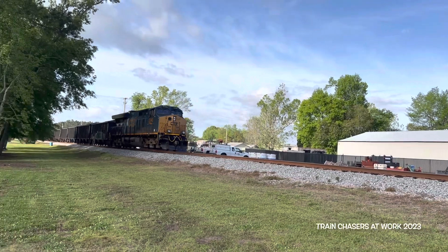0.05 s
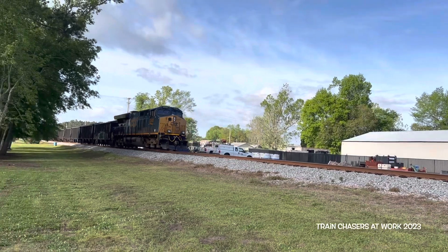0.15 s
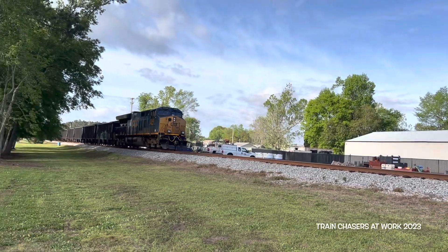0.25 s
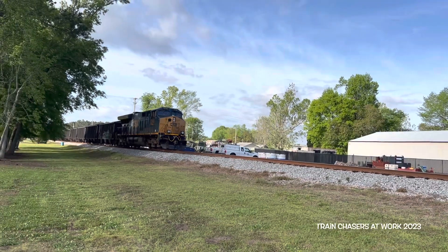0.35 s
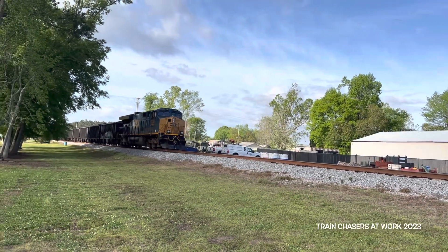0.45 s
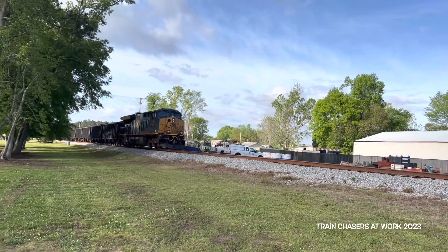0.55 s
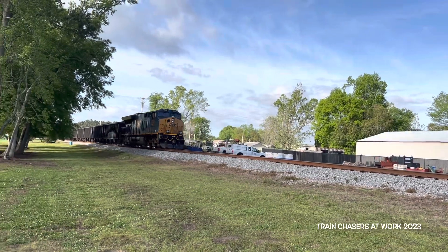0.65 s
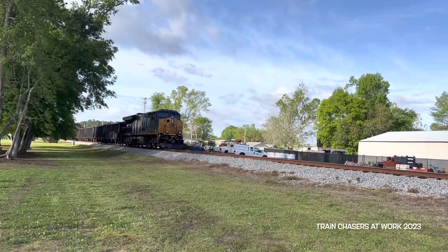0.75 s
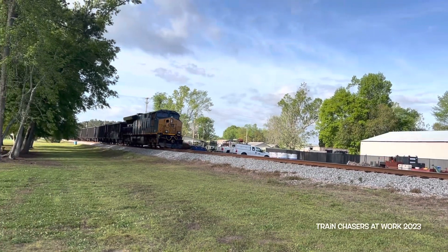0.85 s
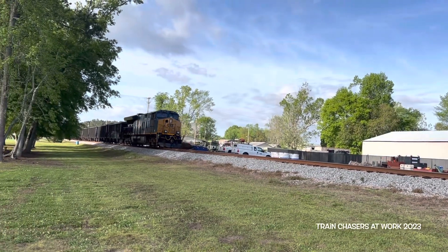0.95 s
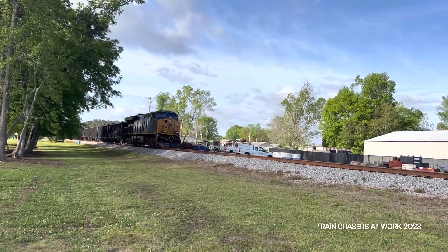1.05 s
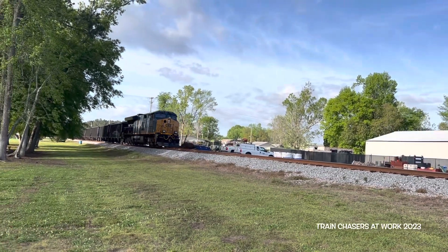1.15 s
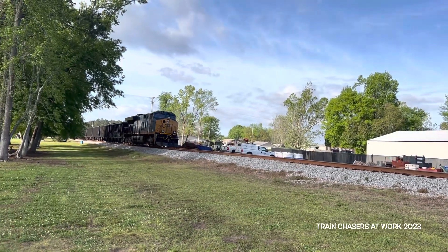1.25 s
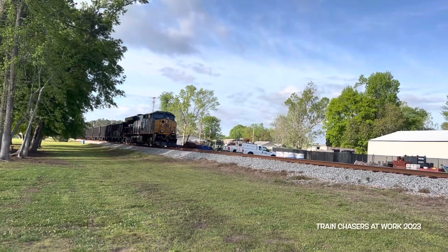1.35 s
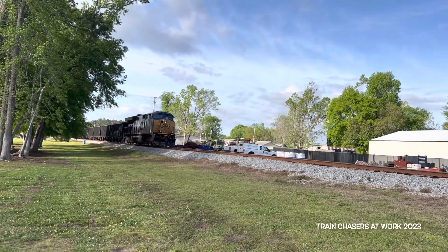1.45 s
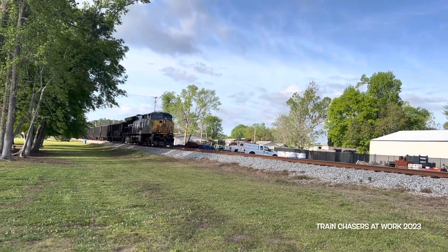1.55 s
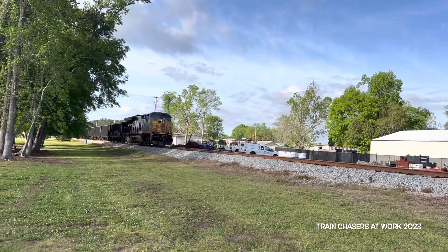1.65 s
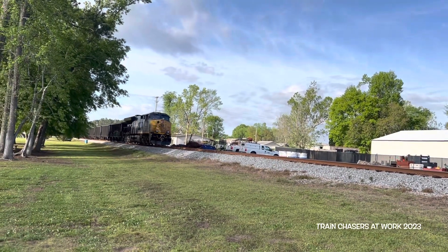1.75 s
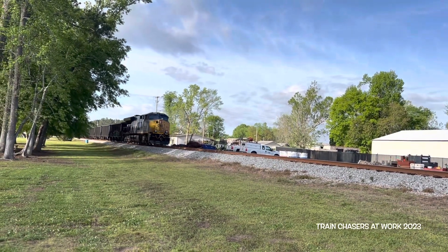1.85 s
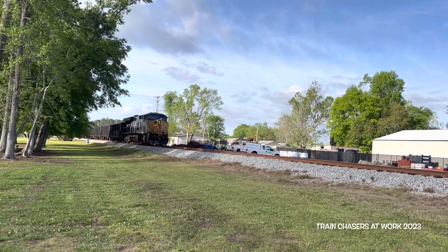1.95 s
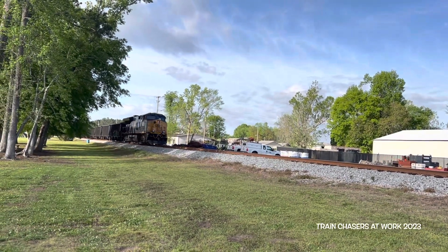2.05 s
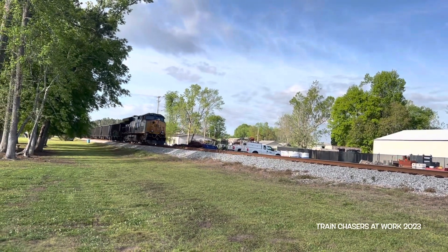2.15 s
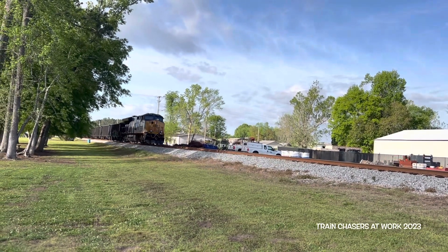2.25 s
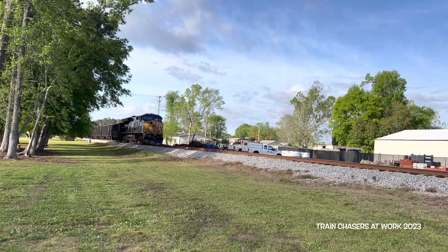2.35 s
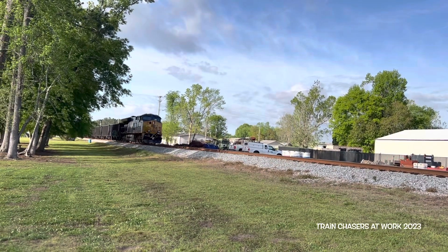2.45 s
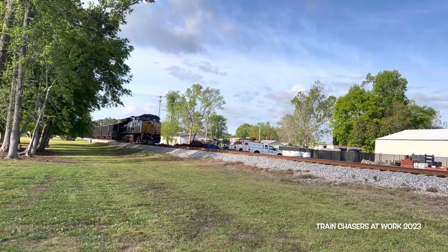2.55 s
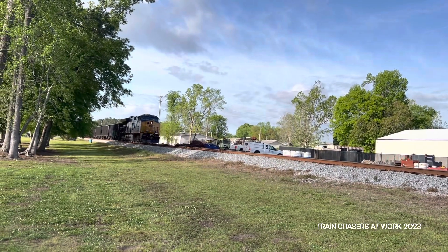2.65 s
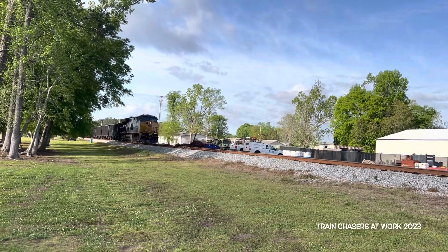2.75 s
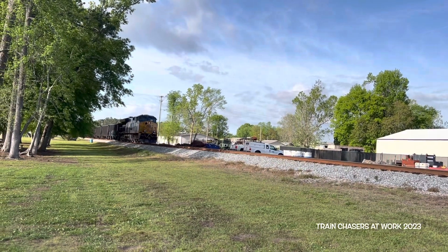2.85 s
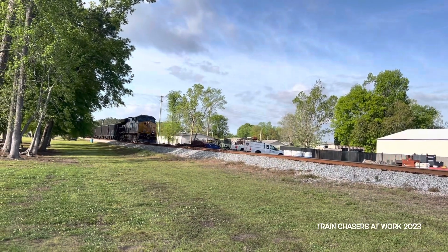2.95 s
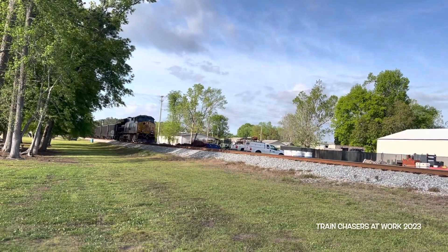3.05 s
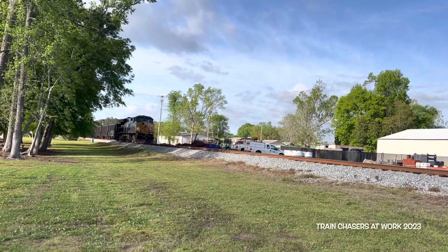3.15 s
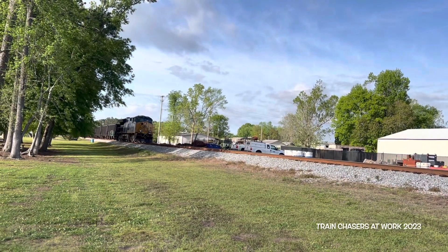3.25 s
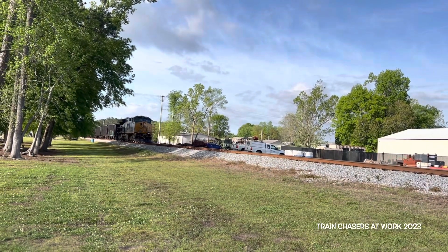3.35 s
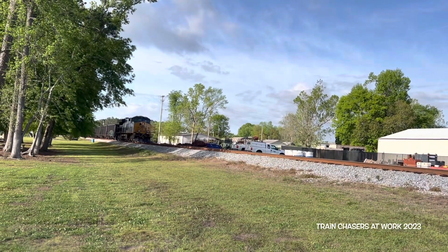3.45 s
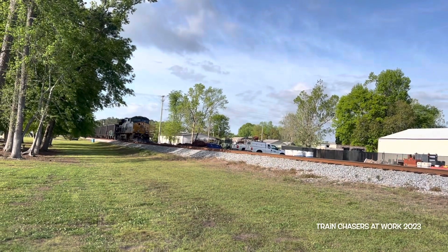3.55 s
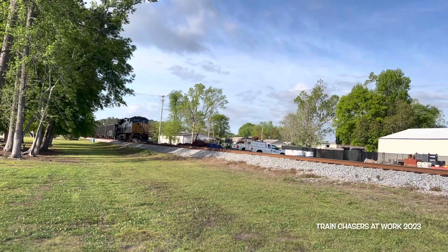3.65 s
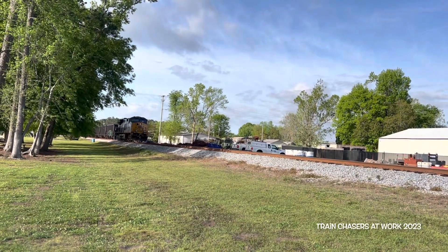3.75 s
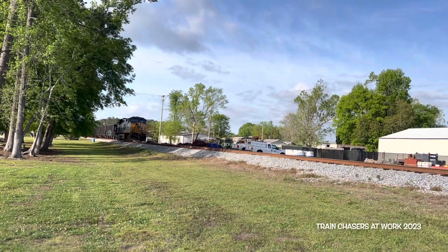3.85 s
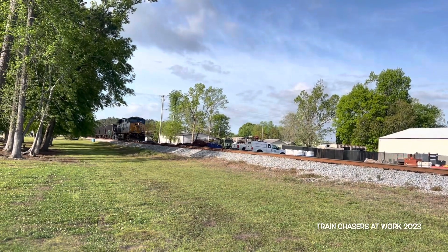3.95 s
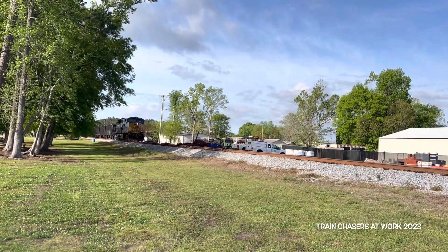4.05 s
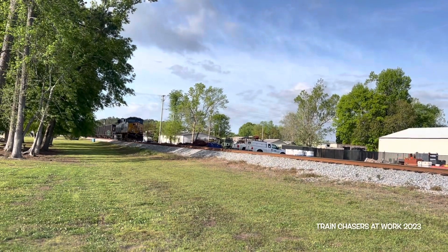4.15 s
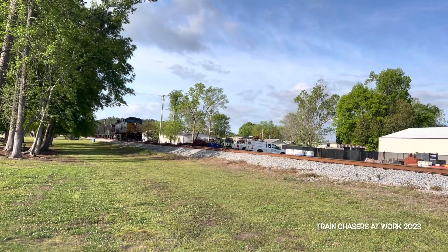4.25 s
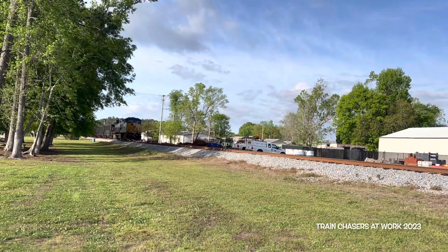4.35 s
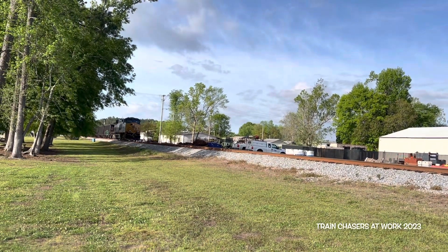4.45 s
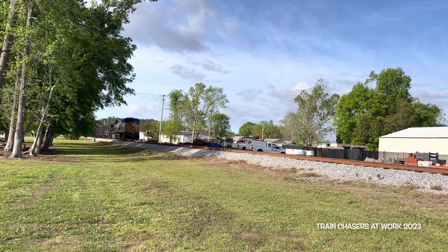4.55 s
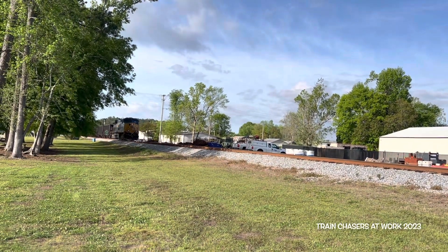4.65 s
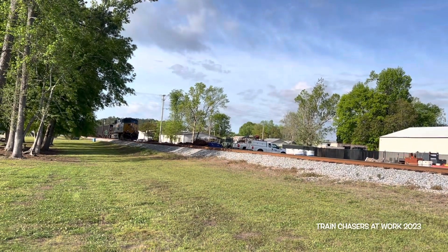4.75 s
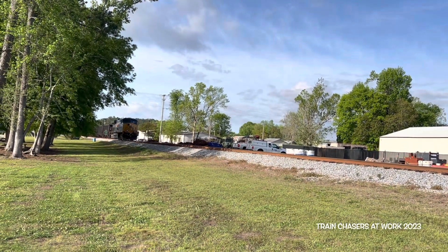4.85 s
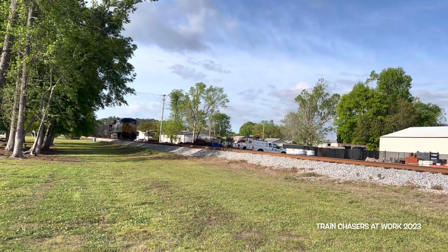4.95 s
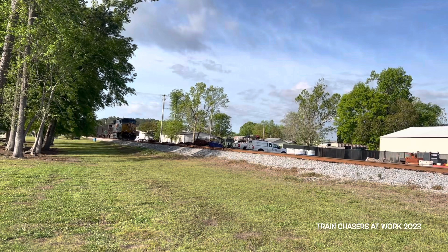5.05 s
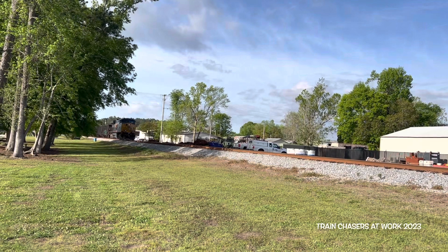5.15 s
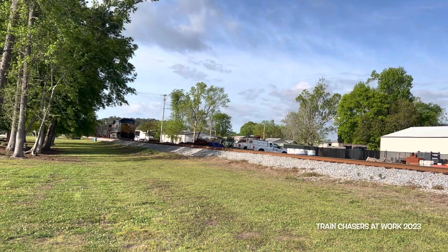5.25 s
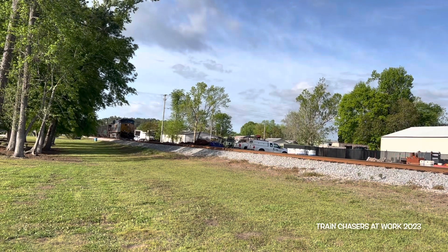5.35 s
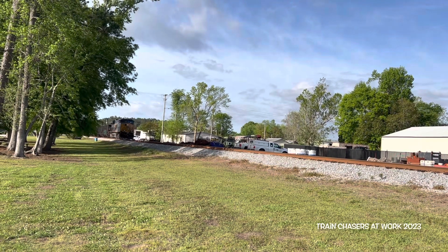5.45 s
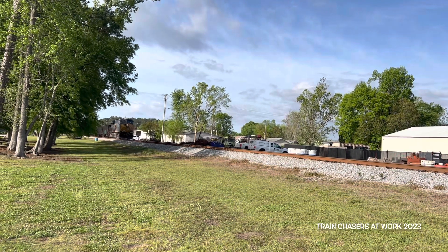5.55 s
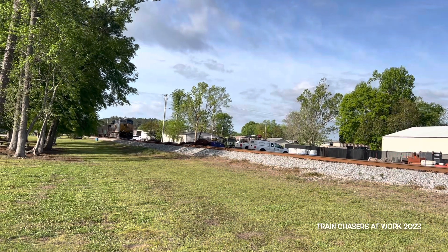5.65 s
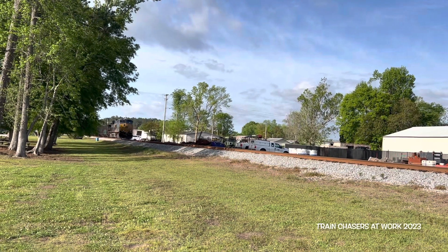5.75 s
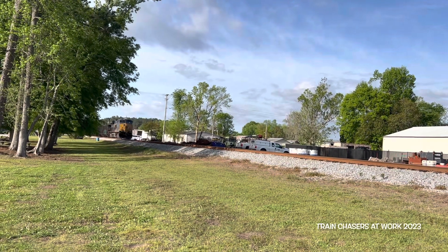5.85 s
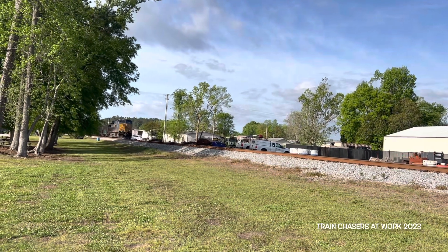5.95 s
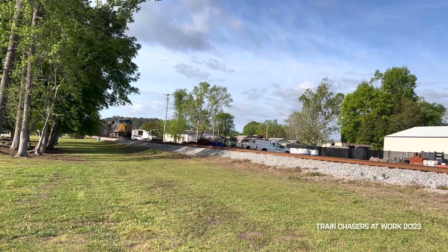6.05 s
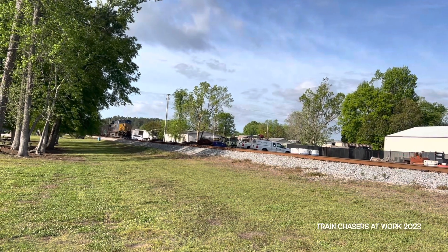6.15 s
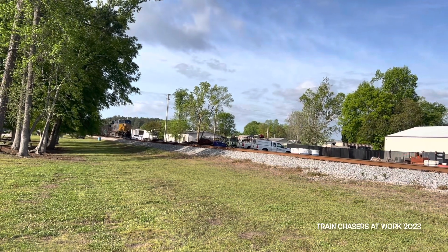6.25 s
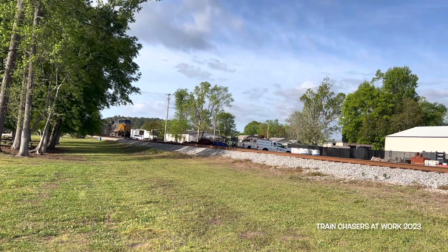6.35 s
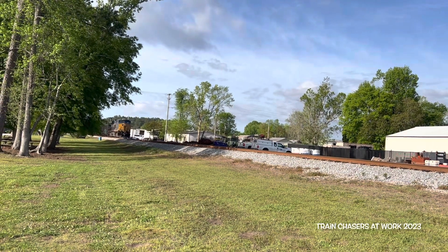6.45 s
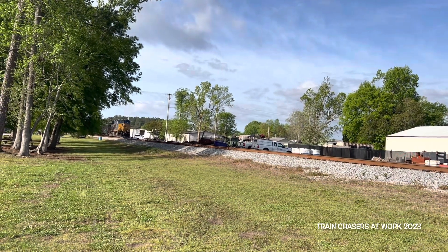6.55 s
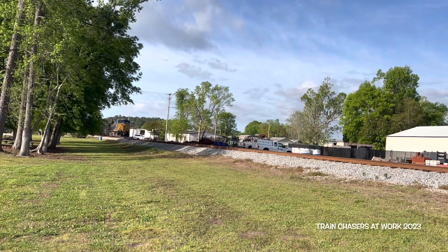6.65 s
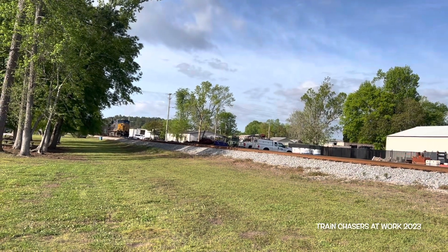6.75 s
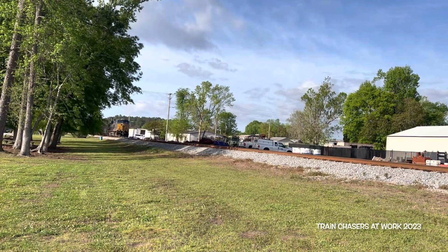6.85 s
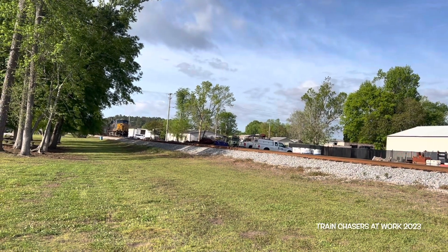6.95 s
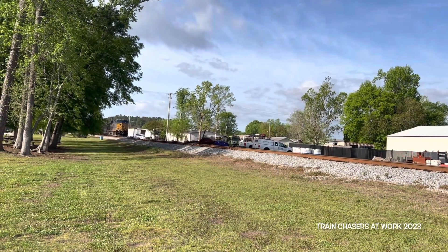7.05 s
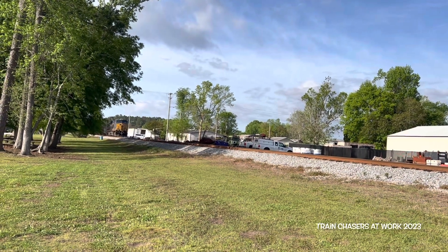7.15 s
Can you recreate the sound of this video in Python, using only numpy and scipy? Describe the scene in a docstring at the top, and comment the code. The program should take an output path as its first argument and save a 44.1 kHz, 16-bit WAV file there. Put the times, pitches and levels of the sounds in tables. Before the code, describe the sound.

Outdoors, a heavy diesel engine's lumpy rumble and fluttering whine recede along the track with rolling wheel roar, growing duller and quieter.

```python
"""A diesel locomotive's uneven exhaust throbs as it pushes the tail of a freight train away along the track.
Each firing excites damped pipe resonances, with turbulent gas and ragged valve bursts as coloured noise.
A fan hums and whines as harmonics of its blade rate; wheels and rails roar, ring and hiss as filtered noise.
Trees scatter the whine back slightly higher. Everything fades with distance, heard from a lawn beside trees
by two close microphone ports, from the left."""
import sys
import numpy as np
from scipy import signal
from scipy.fft import rfft, irfft, next_fast_len
from scipy.io import wavfile

SR = 44100
rng = np.random.default_rng(int(sys.argv[2]) if len(sys.argv) > 2 else 0)


def master_out(mix):
    """Clip the mix to full scale and print it as 16-bit PCM to the path in sys.argv[1]."""
    frames = np.transpose(np.atleast_2d(mix))
    ceiling = np.clip(frames, -1, 1)
    pcm = np.round(ceiling * 32767).astype(np.int16)
    wavfile.write(sys.argv[1], SR, pcm)


N = 317079
PADDED = next_fast_len(N + 8192)
TIME = np.arange(N) / SR
FREQS = np.arange(PADDED // 2 + 1) * SR / PADDED + 1e-3  # Hz, kept above zero for logs and ratios

# engine speed in four-stroke cycles: time_s, cycle_rate_hz
SPEED = [(0, 5.6857), (7.19, 5.6726)]
# fan blade rate as heard: time_s, pitch_hz
BLADE = [(0, 237.8), (1.5, 238.1), (4.5, 239.0), (7.19, 239.3)]
# the locomotive's straight path: distance of the track, speed, time since it passed the listener
TRACK_M, TRAIN_M_S, PASSED_S = 24.3, 8.45, 0.19


def undb(db):
    """Amplitude gain is ten to the power of the decibels over twenty."""
    return 10 ** (np.asarray(db) / 20)


def unit(x):
    """Normalise the mean power, so that the rms is 1."""
    return x / np.sqrt(np.mean(np.abs(x) ** 2))


def curve(rows, axis=1):
    """Interpolate one column of a table linearly in time."""
    rows = np.array(rows, float)
    return np.interp(TIME, rows[:, 0], rows[:, axis])


def across(rows, axis=1):
    """Interpolate one column of a table linearly in log frequency."""
    rows = np.array(rows, float)
    return np.interp(np.log(FREQS), np.log(rows[:, 0]), rows[:, axis])


def shape(x, response):
    """Linear filtering: multiply the spectrum by a frequency response."""
    return irfft(rfft(x, PADDED) * response, PADDED)[..., :N]


def noise(response):
    """Coloured noise: white Gaussian noise filtered by a response, rms 1."""
    return unit(shape(rng.standard_normal(PADDED), response))


def resonance(hz, width_hz):
    """Response of one damped mode, gain 1 at its centre."""
    return 1 / (1 + 1j * (FREQS / hz - hz / FREQS) * hz / width_hz)


def walk(rate_hz):
    """Slow random modulation: noise under a Gaussian low-pass, rms 1."""
    return noise(np.exp(-(FREQS / rate_hz) ** 2))


def receding(start_db, loss_db):
    """Spreading loss: a source on the train loses loss_db each time its distance doubles."""
    distance = np.hypot(TRACK_M, TRAIN_M_S * (TIME + PASSED_S))
    return undb(start_db - loss_db * np.log2(distance / distance[0]))


def tree_scatter(turns, spread=0.018, start_db=-41.5, loss_db=8.0):
    """Doppler spread: trees down the line see the fan recede less fast, so echoes smear each harmonic upward."""
    # whine scattered by the trees: blade_harmonic, relative_level_db
    scatter = [(1, -3), (3, -4.5), (4, -8.5), (5, -7), (6, -13)]
    out = 0
    for order, db in scatter:
        spread_hz = spread * order * BLADE[0][1]
        # an analytic signal has positive frequencies only, so the shift is always upward
        echoes = signal.hilbert(noise(np.exp(-FREQS / spread_hz / 2)), PADDED)[:N]
        harmonic = np.exp(2j * np.pi * order * turns)
        out = out + undb(db) * unit(np.real(echoes * harmonic))
    return out * receding(start_db, loss_db)


def wheels(flicker_db=1.1):
    """Rolling contact noise: rough steel on steel gives roar, rail ring and hiss, flickering in moving air."""
    # colour of the rolling noise: frequency_hz, relative_level_db
    roll_colour = [(150, -16), (330, -5), (450, -4.5), (650, -2), (850, -3.5), (1100, -4.5), (1280, -6),
                   (1450, -8), (1700, -8), (2100, -12.5), (2800, -11), (3800, -13), (5400, -14),
                   (6400, -17), (7500, -20), (8600, -19), (9700, -30)]
    colour = undb(across(roll_colour))
    low = 1 / (1 + (FREQS / 1250) ** 8)
    high = 1 - 1 / (1 + (FREQS / 3500) ** 8)
    middle = np.abs(1 - low - high)

    # the trees screen off the hiss as the locomotive slips behind them
    screen_at_s, screen_s, screen_db = 5.5, 0.3, 3.5
    screen = undb(-screen_db * (1 + np.tanh((TIME - screen_at_s) / screen_s)) / 2)
    roar_gain = receding(-39.5, loss_db=8)
    ring_gain = receding(-41.5, loss_db=7.5)
    hiss_gain = receding(-46.5, loss_db=8) * screen

    out = 0
    for power_share, gain in [(low, roar_gain), (middle, ring_gain), (high, hiss_gain)]:
        flicker = undb(flicker_db * walk(12.3))
        out = out + noise(colour * np.sqrt(power_share)) * gain * flicker
    return out


def wheel_rings(drift_hz=35, broken_db=2.1):
    """Modal ringing as narrow-band noise: pitch and level wander as the contact shifts on the rail, and the
    turbocharger's thin whistle wavers alike."""
    # hissing wheel resonances, and at 7000 Hz a thin whistle of the turbocharger: pitch_hz, width_hz,
    # start_level_db, loss_per_doubling_db
    hisses = [(2826, 150, -55.5, 3.5), (4606, 380, -59, 6), (5430, 400, -58.5, 5), (6530, 450, -66, 6.5),
              (7000, 250, -62.5, 6.5), (8250, 430, -66, 8)]
    out = 0
    for hz, width, db, loss_db in hisses:
        envelope = 1 / (1 + (2 * FREQS / width) ** 2)
        phase = 2 * np.pi * np.cumsum(hz + drift_hz * walk(3)) / SR
        # two independent noises in quadrature make a band around the drifting pitch
        ring = noise(envelope) * np.cos(phase) + noise(envelope) * np.sin(phase)
        out = out + ring * undb(broken_db * walk(7.7)) * receding(db, loss_db)
    return out


def knocks(ring_s=0.011):
    """Impact decay: dull short blows in the bogies, and a soft low rumble that swells and sinks around 5.4 s."""
    # knocks from the running gear: start_s, level_db
    blow_rows = [(2.879, -38.5), (5.645, -40)]
    blows = 0
    for start_s, db in blow_rows:
        decay = np.exp(-np.abs(TIME - start_s) / ring_s)
        blows = blows + undb(db) * (TIME > start_s) * decay
    swell_at_s, swell_s, swell_db = 5.4, 0.94, -56
    rumble = undb(swell_db) * np.exp(-((TIME - swell_at_s) / swell_s) ** 2)
    return (blows + rumble) * noise(resonance(380, 520) ** 2)


def machinery(unsteady_db=1.0):
    """Narrow-band resonance and phase modulation: thin unsteady whistles and a wavering motor gear tone."""
    # thin whistles, the narrow one at 2385 Hz being the fan's tenth blade harmonic: pitch_hz,
    # resonance_width_hz, start_level_db, loss_per_doubling_db
    whistles = [(643.5, 50, -56, 5), (933, 9.1, -55.5, 10.5), (1132, 16, -56.5, 6.5), (2385, 10, -61, 11.5)]
    out = 0
    for hz, width, db, loss_db in whistles:
        whistle = noise(resonance(hz, width) ** 2)
        out = out + whistle * undb(unsteady_db * walk(3.4)) * receding(db, loss_db)
    gear_hz = 1393
    gear = np.sqrt(2) * np.sin(2 * np.pi * gear_hz * TIME + 0.7 * walk(7.8))
    return out + gear * receding(-50, loss_db=12.5)


def fan(turns, waver=0.26, flutter_db=1.66, fading_db=1.1, whine_db=-1.2):
    """Blade-passing tones: a beating hum, and three harmonics that swell apart, shaken by the moving air."""
    # hum at the blade rate: time_s, level_db
    hum_levels = [(0.0, -45), (0.12, -36), (0.35, -36.5), (0.5, -31.5), (0.65, -40.5), (0.9, -44),
                  (1.05, -48), (1.35, -44), (1.62, -48), (1.85, -41.5), (2.5, -40.5), (3.05, -37.5),
                  (3.5, -38.5), (4.05, -45), (4.3, -40), (4.55, -47), (4.85, -44.5), (5.2, -52),
                  (5.65, -44.5), (6.1, -53.5), (6.6, -48), (7.18, -46)]
    # third, fourth and fifth blade harmonics, each before the whine_db trim: time_s, level_db
    whine_low = [(0.0, -37.5), (0.25, -37), (0.5, -40.5), (0.62, -48), (0.92, -40.5), (1.15, -44.5),
                 (1.32, -45.5), (1.42, -45), (1.55, -59), (1.75, -43), (1.98, -44), (2.16, -54),
                 (2.36, -45), (2.5, -55), (2.95, -57), (3.3, -50.5), (3.5, -63), (3.7, -55), (3.9, -63),
                 (4.08, -56), (4.35, -44.5), (4.5, -62), (4.62, -45.5), (4.95, -59), (5.15, -61),
                 (5.4, -60), (5.7, -52), (6.0, -62), (6.65, -72), (6.95, -58), (7.18, -69)]
    whine_mid = [(0.0, -43.5), (0.7, -47), (1.0, -53), (1.45, -47.5), (1.7, -66), (2.201, -46.5),
                 (2.5, -61.5), (3.6, -52), (4.4, -56.5), (5.1, -62.5), (5.9, -55), (7.18, -82)]
    whine_high = [(0.0, -48), (0.12, -40), (0.24, -46.5), (0.34, -39.5), (0.52, -36), (0.6, -39),
                  (0.74, -54), (0.9, -34), (1.08, -41), (1.19, -47), (1.28, -37), (1.46, -44), (1.64, -38),
                  (1.87, -51.5), (2.03, -41.5), (2.2, -45.5), (2.4, -53), (2.68, -41), (2.96, -47),
                  (3.12, -41), (3.19, -45.5), (3.27, -56), (3.46, -48.5), (3.8, -56.5), (4.0, -53),
                  (4.35, -58), (4.5, -46), (4.78, -57), (4.93, -48.5), (5.1, -55.5), (5.4, -59),
                  (5.78, -52), (5.92, -65), (6.36, -50), (6.8, -77), (7.18, -58)]

    out = np.sin(2 * np.pi * turns) * undb(curve(hum_levels))
    # a tone just below the hum beats with it; the two are in phase at beat_at_s
    beat_hz, beat_at_s = 5.3, 1.2
    lower_turns = turns - beat_hz * (TIME - beat_at_s)
    out = out + np.sin(2 * np.pi * lower_turns) * receding(-45.5, loss_db=10.5)

    for order, levels in enumerate([whine_low, whine_mid, whine_high], 3):
        phase = 2 * np.pi * order * turns + waver * np.sqrt(order) * walk(10.4)
        # the slower fading deepens as the train moves away
        air_db = flutter_db * walk(36) + fading_db * np.sqrt(TIME / TIME[-1]) * walk(20)
        out = out + np.sin(phase) * undb(curve(levels) + whine_db + air_db)
    return np.sqrt(2) * out


def exhaust(cycle, scatter_db=1.0, gas_db=-6.5, gas_throb=0.083, bark_db=-36.0, bark_loss_db=4.0, alike=0.29):
    """Pulse-excited pipe modes: two banks of unequal cylinders fire in turn, and gas rushes out with them."""
    # exhaust pulse of each cylinder in firing order: relative_level_db
    cylinders = [-6, -4, -4.5, -4.5, -8.5, -19.5, -8, -0.5, -11, -13, -12.5, -3]
    # exhaust pipe resonances: pitch_hz, width_hz, relative_level_db
    pipe_modes = [(51.35, 4.53, -4.5), (82.88, 2.64, -0.5), (114.8, 2.7, -19.5), (171.85, 1.93, -22.5),
                  (225.6, 1.8, -25), (33.7, 2.34, -23.5)]
    # turbulent gas leaving the stack: frequency_hz, relative_density_db_per_hz
    gas_colour = [(15, -34), (29, -29), (38, -19), (50, -3.5), (70, 4), (88, 4), (105, -3), (135, -9.5),
                  (175, -16), (250, -17.5), (300, -29.5), (500, -59.5)]
    # ragged burst from the exhaust valves: frequency_hz, relative_density_db_per_hz
    bark_colour = [(85, -8), (115, 2.5), (150, 2), (200, -0.5), (235, -2.5), (260, -6.5), (295, -12),
                   (450, -47.5)]
    # throb above about 60 Hz: time_s, level_db
    throb_levels = [(0.0, -25), (0.17, -27), (0.3, -30), (0.47, -24.5), (0.6, -25.5), (0.77, -28),
                    (1.03, -22.5), (1.2, -24.5), (1.62, -25), (1.8, -27.5), (2.05, -30), (2.17, -35.5),
                    (2.45, -27), (2.7, -26.5), (2.88, -28), (3.17, -26), (3.5, -29.5), (3.6, -33),
                    (3.85, -30), (4.22, -29.5), (4.3, -35), (4.42, -29), (4.72, -32.5), (4.92, -29),
                    (5.11, -27), (5.17, -40), (5.42, -31), (5.6, -37), (6.2, -34.5), (6.8, -33),
                    (7.18, -34.5)]
    # deepest boom, below about 60 Hz: time_s, level_db
    boom_levels = [(0.0, -27), (0.25, -29), (0.68, -25), (1.2, -31), (1.38, -27), (1.85, -33), (2.1, -28),
                   (2.28, -33.5), (2.48, -36), (2.95, -33.5), (3.12, -29), (3.5, -31.5), (3.9, -31),
                   (4.23, -32.5), (4.35, -40.5), (4.53, -32.5), (4.75, -36.5), (4.95, -32), (5.52, -36.5),
                   (6.3, -36), (6.7, -37), (7.18, -38)]

    # firing times, in firing intervals; every second firing belongs to the other bank and comes early
    first_firing, bank_lag = .73, -.31
    count = len(cylinders)
    firing = np.arange(int(cycle[-1] * count) - 1)
    firing_cycle = (firing + first_firing + bank_lag * (firing % 2)) / count
    at = np.searchsorted(cycle, firing_cycle)
    pulses = np.zeros(N)
    pulses[at] = undb(np.ravel(cylinders)[firing % count] + scatter_db * rng.standard_normal(len(at)))

    # neighbouring rows of the table have opposite sign
    pipe = sum((-1) ** k * undb(db) * resonance(hz, width) for k, (hz, width, db) in enumerate(pipe_modes))
    # the open stack radiates almost nothing of the deepest orders
    mouth = signal.freqs(*signal.butter(4, 31, "high", analog=True), FREQS)[1]
    flow = 1 - gas_throb + gas_throb * unit(shape(pulses, 1 / (1 + 1j * FREQS / 14) ** 2))
    gas = unit(noise(undb(across(gas_colour))) * flow)
    throb = unit(shape(pulses, pipe * mouth)) + undb(gas_db) * gas
    boom = shape(throb, 1 / (1 + (FREQS / 61) ** 24))

    # the valves release a ragged burst that is partly the same in every engine cycle
    place_in_cycle = (cycle % 1 * SR / SPEED[0][1]).astype(int)
    same = rng.standard_normal(N)[place_in_cycle]
    ragged = np.sqrt(alike) * same + np.sqrt(1 - alike) * rng.standard_normal(N)
    bark = unit(shape(ragged * flow, undb(across(bark_colour))))

    out = unit(throb - boom) * undb(curve(throb_levels))
    out = out + unit(boom) * undb(curve(boom_levels))
    return out + bark * receding(bark_db, bark_loss_db)


def ports(direct, ahead, sideways, swing=0.46):
    """Spatial coherence and phase lead: diffuse sound is partly alike, partly opposed at the two ports."""
    # the two ports: frequency_hz, coherence_0_to_1, left_lead_rad, left_minus_right_db
    port_rows = [(90, .998, .06, -.8), (250, .9, .44, -.4), (600, .72, .47, 1), (1000, .55, .4, 1.3),
                 (1200, .62, .87, .6), (1750, .48, .75, 2.3), (2400, .75, 2.3, 0), (3400, .76, 2.7, 1.6),
                 (4400, .43, 3.5, 3.7), (5400, .44, 3.7, 3.6), (6500, .3, 5, 1), (6800, .3, 4.6, 1.5),
                 (7010, .7, 3.4, 2.8), (7250, .35, 4.7, 2.8), (7700, .5, 7.1, 2.6), (8400, .95, 6.3, 0),
                 (8900, .75, 6, .3), (9500, .6, 4.3, .5)]
    coherence = across(port_rows)
    lead, tilt_db = across(port_rows, axis=2), across(port_rows, axis=3)
    side = np.array([[1], [-1]])  # left, right
    alike = shape(ahead, np.sqrt((1 + coherence) / 2))
    opposed = shape(sideways, np.sqrt((1 - coherence) / 2))
    pair = direct + alike + side * opposed

    def heard(turn):
        """Phase and level differences between the ports for one bearing of the train."""
        turned_lead = lead + turn * np.sin(lead / 2)
        return shape(pair, undb(side * tilt_db / 2) * np.exp(.5j * side * turned_lead))

    # crossfade between two bearings as the train moves off to the left
    gone = np.sqrt(TIME / TIME[-1])
    return (1 - gone) * heard(-swing) + gone * heard(swing)


def scene():
    """Superposition: engine, fan and knocks arrive directly; the other sounds come from many directions."""
    cycle = np.cumsum(curve(SPEED)) / SR
    turns = np.cumsum(curve(BLADE)) / SR
    direct = exhaust(cycle) + fan(turns) + knocks()
    # two independent diffuse fields
    ahead, sideways = (wheels() + wheel_rings() + tree_scatter(turns) + machinery() for _ in range(2))
    return ports(direct, ahead, sideways)


def record(dry):
    """Band limiting: a steep elliptic low-pass cuts the top above 9500 Hz."""
    return signal.sosfilt(signal.ellip(8, .2, 70, 9500, fs=SR, output="sos"), dry)


dry = scene()
out = record(dry)
master_out(out)
```